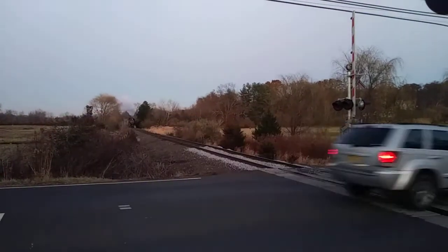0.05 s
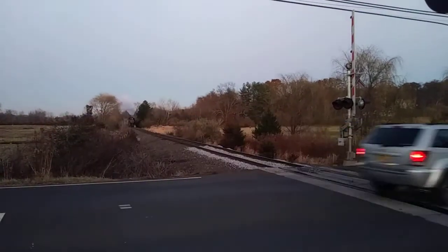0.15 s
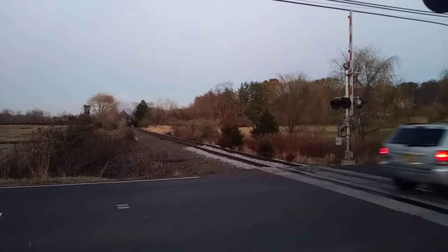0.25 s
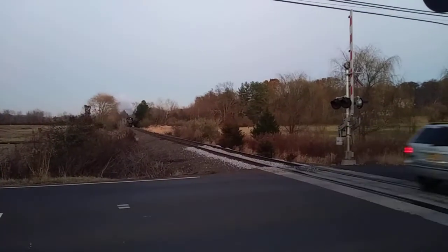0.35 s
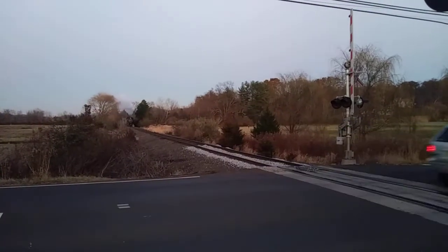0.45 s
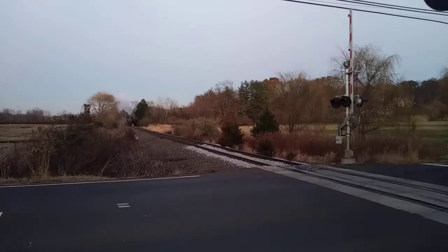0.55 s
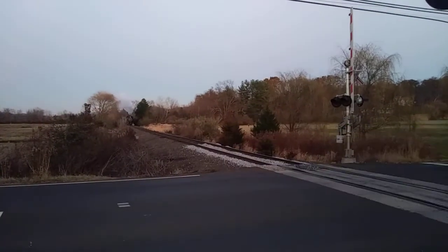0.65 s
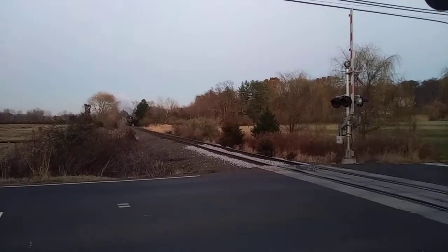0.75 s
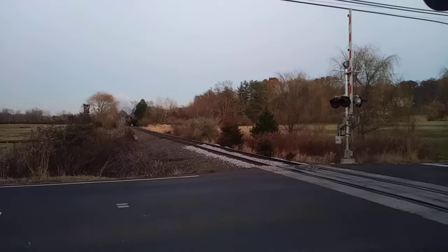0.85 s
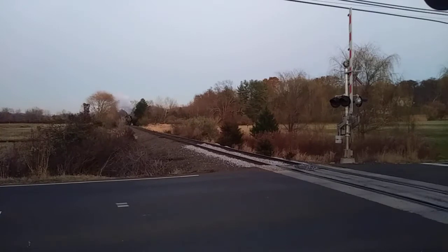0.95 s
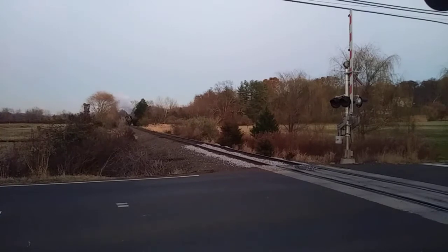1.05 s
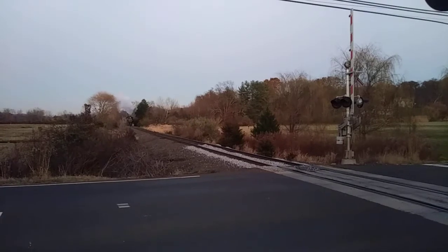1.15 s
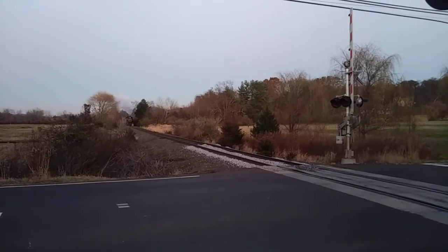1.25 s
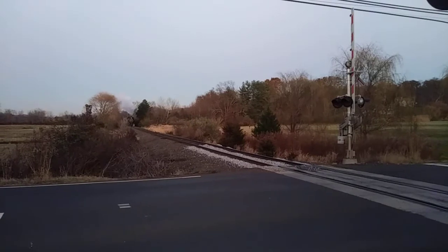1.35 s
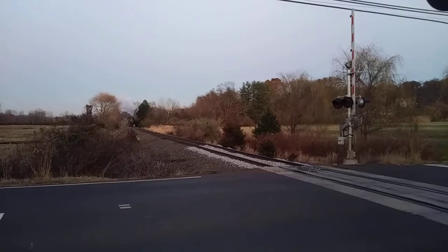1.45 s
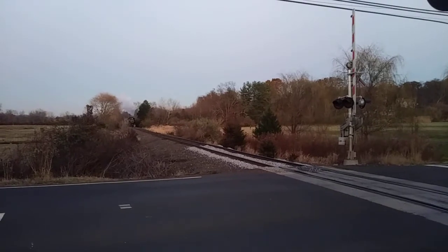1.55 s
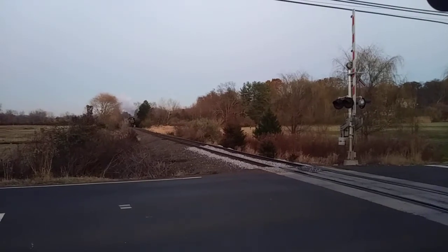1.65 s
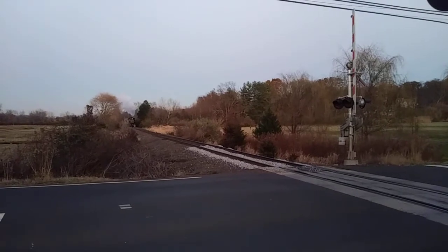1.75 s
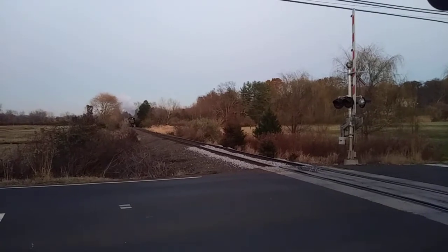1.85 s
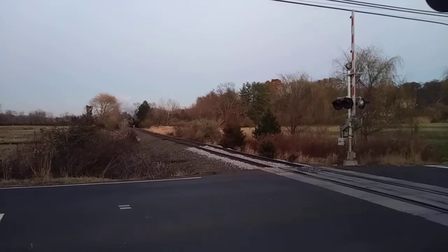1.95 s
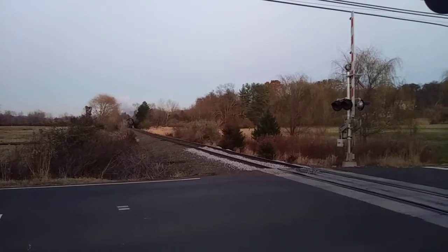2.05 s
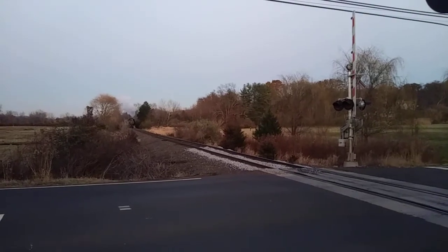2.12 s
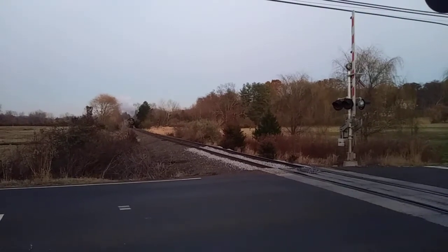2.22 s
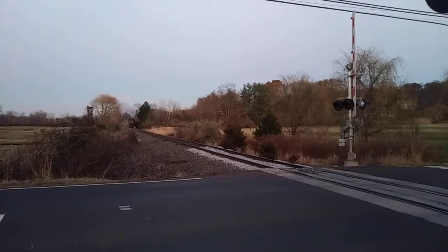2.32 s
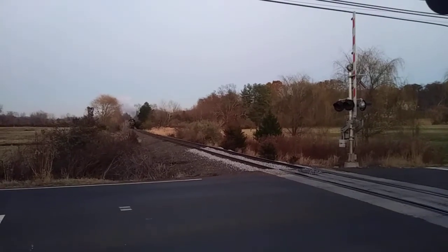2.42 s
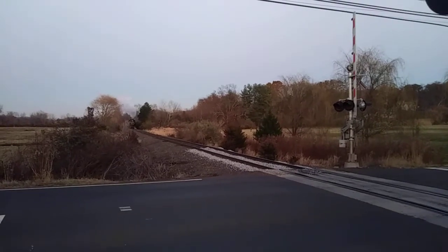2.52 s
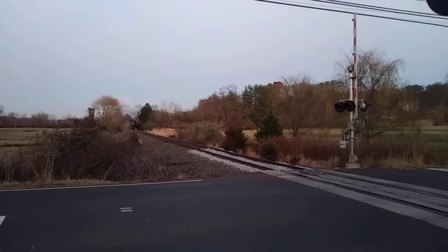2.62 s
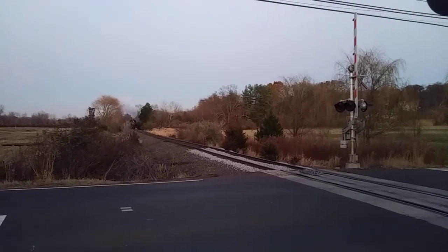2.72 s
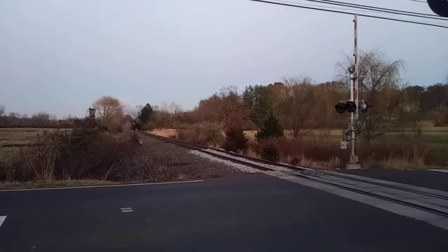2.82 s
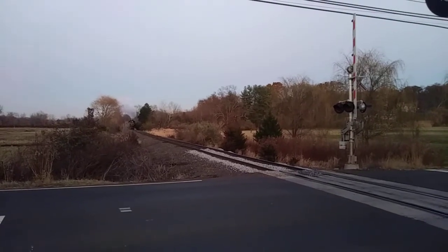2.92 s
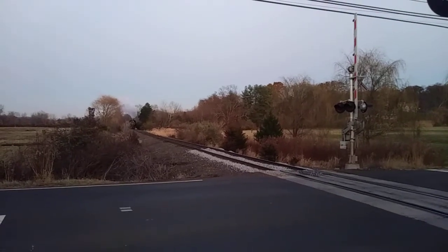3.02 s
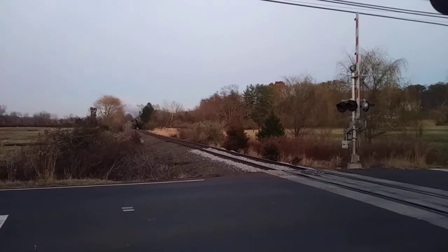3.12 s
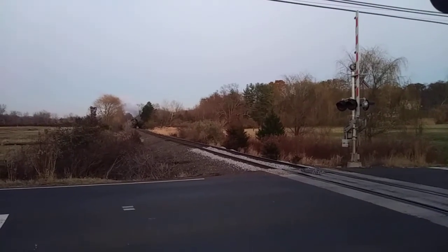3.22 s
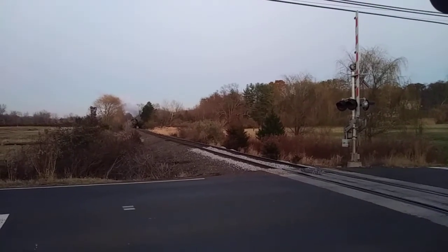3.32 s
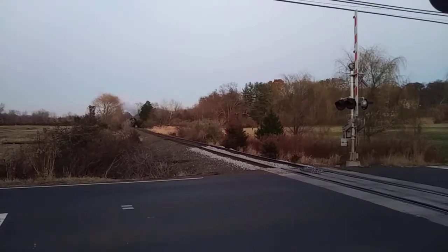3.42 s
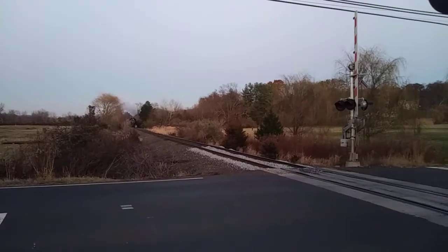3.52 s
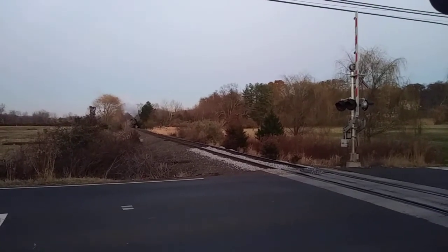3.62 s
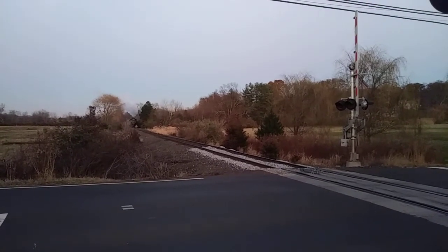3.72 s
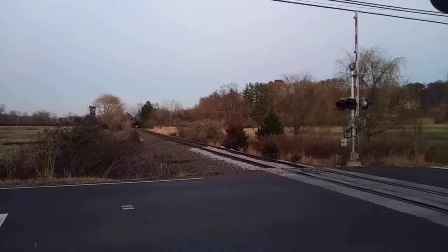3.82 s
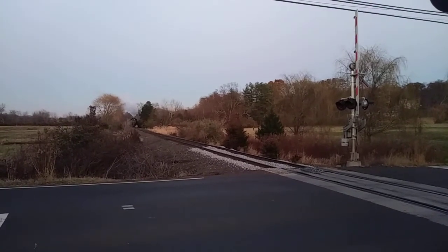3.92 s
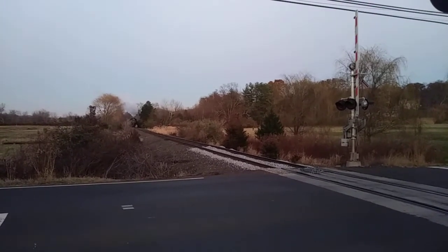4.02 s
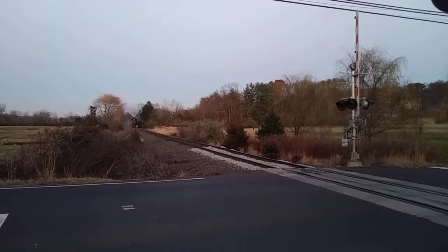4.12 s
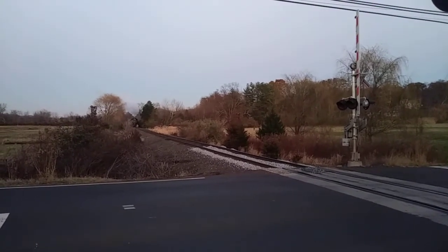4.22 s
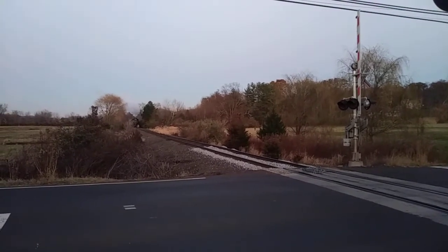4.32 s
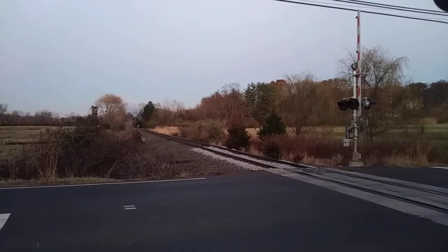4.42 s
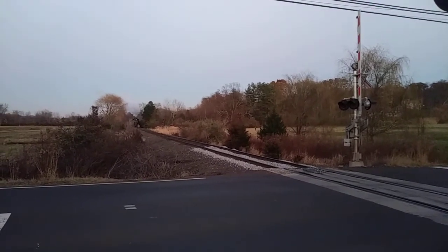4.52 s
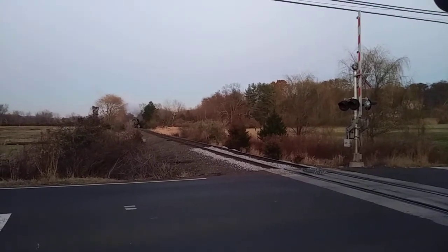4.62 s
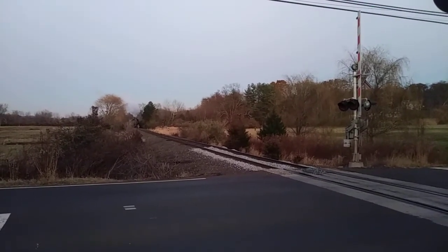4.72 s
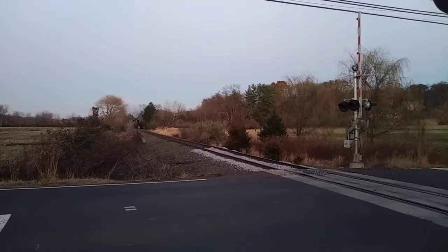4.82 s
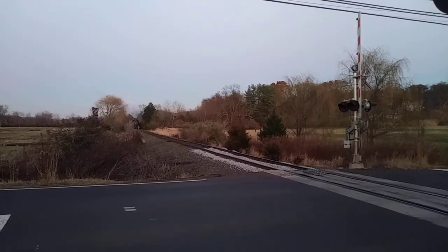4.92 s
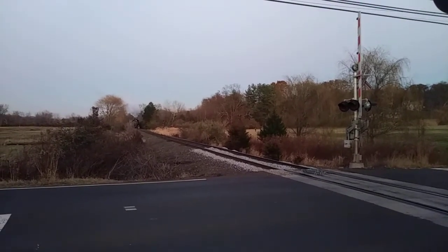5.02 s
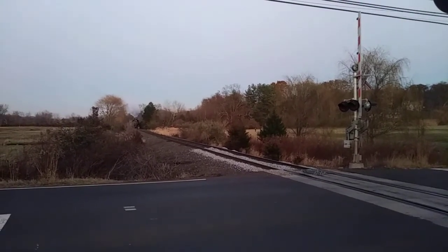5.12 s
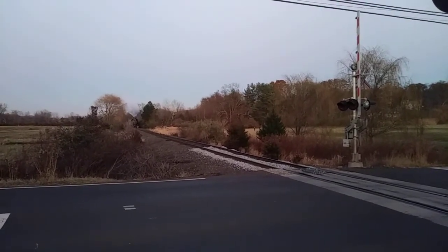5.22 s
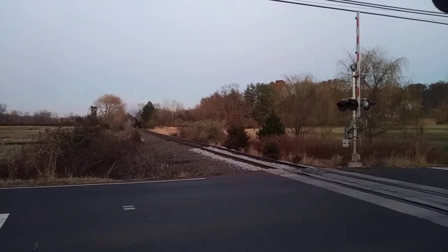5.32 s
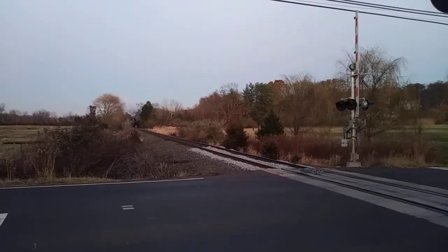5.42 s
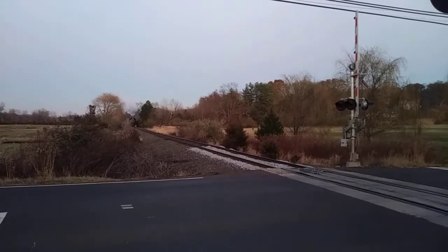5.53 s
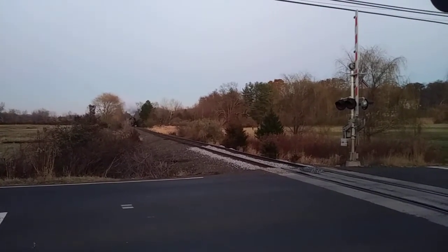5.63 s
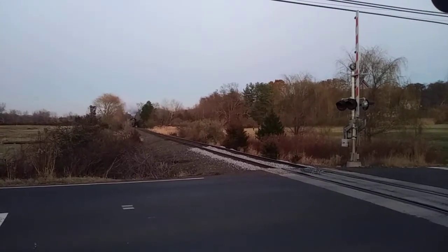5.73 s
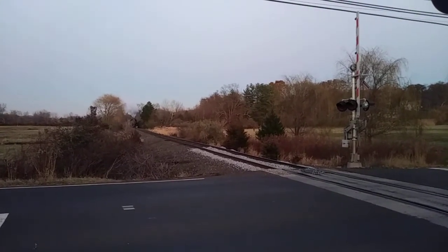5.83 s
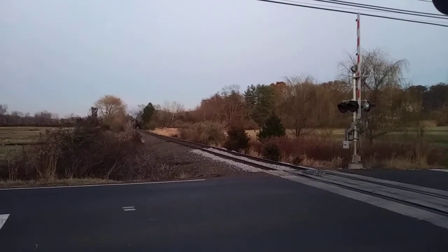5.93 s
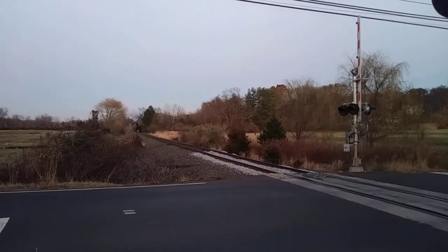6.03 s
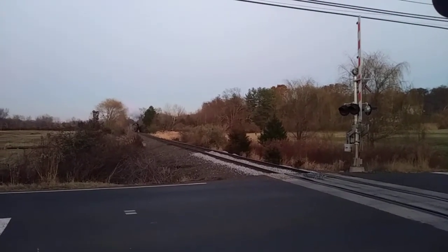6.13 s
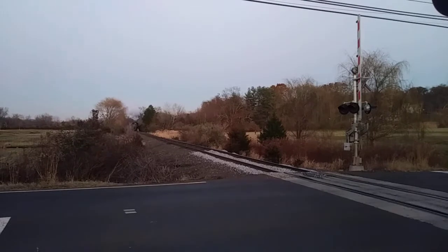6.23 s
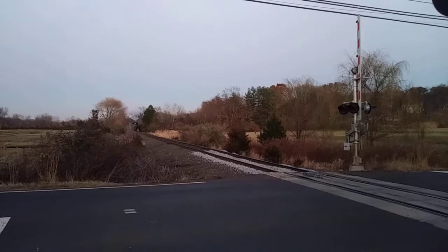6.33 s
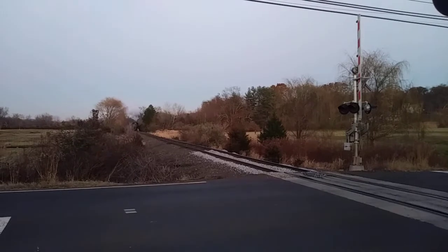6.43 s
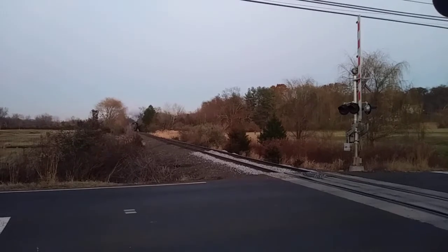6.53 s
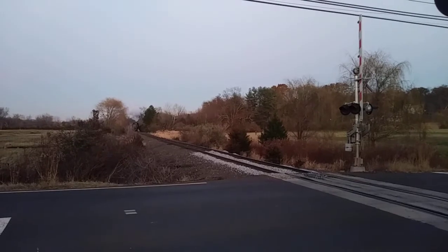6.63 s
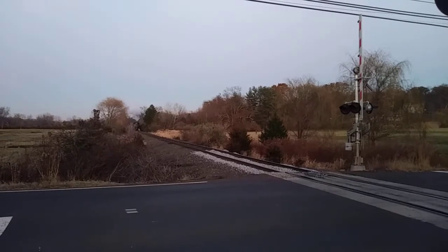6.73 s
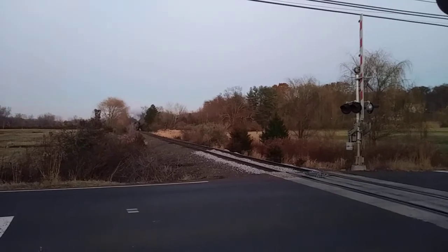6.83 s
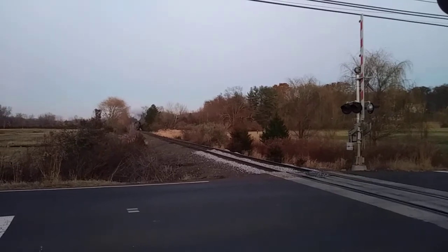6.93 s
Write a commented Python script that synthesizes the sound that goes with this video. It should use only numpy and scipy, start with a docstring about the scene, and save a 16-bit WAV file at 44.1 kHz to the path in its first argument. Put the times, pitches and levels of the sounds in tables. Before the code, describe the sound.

Tyres clatter over the rails of a country level crossing in three quick thumps, then the car rolls off with a dull, fading roar. Shortly after, something knocks hard inside the parked car where the phone microphone sits. The rest is quiet: thin, flickering road noise through the closed windows, occasional soft bumps of the car body, a light tick and a faint puff of hiss.

```python
"""Inside a parked car. In the first half second another car's tyres thump over the panels of a level
crossing, which ring and rattle. It rolls away; its road roar carries on through the cabin resonances.
From 0.7 s the body bumps softly, with faint ticks and pips. At 1.5 s something knocks in the cabin;
at 6 s comes a brief hiss. Throughout, a phone's noise suppressor pushes the steady background down,
so only what rises over it flickers through."""
import sys
import numpy as np
from scipy import signal
from scipy.fft import rfft, irfft
from scipy.io import wavfile
from scipy.ndimage import uniform_filter1d, map_coordinates

SR = 44100
rng = np.random.default_rng(int(sys.argv[2]) if len(sys.argv) > 2 else 0)


def put_to_file(sound):
    """Save the sound as 16-bit audio at rate SR, in the file named by the first command-line argument."""
    columns = np.atleast_2d(sound).T  # one column per channel
    safe = np.clip(columns, -1, 1)
    whole_steps = np.round(safe * 32767)
    wavfile.write(sys.argv[1], SR, whole_steps.astype(np.int16))


N = 306980
FRAME = 512
STFT = dict(fs=SR, nperseg=FRAME, noverlap=FRAME * 3 // 4)


def from_db(db):
    """Decibels to gain."""
    return 10 ** (np.asarray(db) / 20)


def unit_rms(x):
    """Scale to unit rms."""
    return x / np.sqrt(np.mean(x ** 2) + 1e-20)


def at_hz(table, hz):
    """Read a table on a log-frequency axis."""
    table_hz, values = np.transpose(table)
    return np.interp(np.log(np.maximum(hz, 1)), np.log(table_hz), values)


def band(x, low_hz, high_hz, order=2):
    """Butterworth band-pass."""
    sos = signal.butter(order, [low_hz, min(high_hz, .45 * SR)], "band", fs=SR, output="sos")
    return signal.sosfilt(sos, x)


def bell(hz, centre_hz, width_hz):
    """Flat-topped resonance; passes about unit power of white noise."""
    return np.exp(-np.abs(2 * (hz[:, None] - centre_hz) / width_hz) ** 3) * SR / (1.79 * width_hz)


def flare(t, start_s, attack_s, hold_s, t60_s):
    """Envelope: linear rise, hold, exponential fall."""
    rise = np.clip((t - start_s) / attack_s, 0, 1)
    return rise * from_db(-60 * np.maximum(t - start_s - attack_s - hold_s, 0) / t60_s)


def clicks(start_s, level_db):
    """Single-sample impulses."""
    out = np.full(N, 1e-18)
    out[(np.asarray(start_s) * SR).astype(int)] = from_db(level_db)
    return out


def ring(x, hz, t60_s):
    """One mode: a unit click starts a decaying unit sine."""
    r, w = from_db(-60 / (t60_s * SR)), 2 * np.pi * hz / SR
    return signal.lfilter([0, np.sin(w)], [1, -2 * r * np.cos(w), r * r], x)


def strike(start_s, level_db, tilt_db_per_oct, modes):
    """Each contact rings all modes, with random spread; harder contacts tilt towards the high ones."""
    spread_db = 1.5 * rng.standard_normal((len(start_s), len(modes)))
    out = np.zeros(N)
    for k, (hz, gain_db, t60_s) in enumerate(modes):
        drive_db = level_db + gain_db + tilt_db_per_oct * np.log2(hz / 250) + spread_db[:, k]
        out += ring(clicks(start_s, drive_db), hz, t60_s)
    return out


def snap(start_s, level_db, t60_s, low_hz, high_hz):
    """Short bursts of band noise."""
    envelope = signal.lfilter([1], [1, -from_db(-60 / (t60_s * SR))], clicks(start_s, level_db))
    burst = band(envelope * rng.standard_normal(N), low_hz, high_hz)
    return burst * np.sqrt(SR / 2 / (high_hz - low_hz))


def noise_tail(start_s, level_db, spectrum, decay):
    """Each contact starts noise; each quarter octave decays at its own rate."""
    end = int((start_s[-1] + .8) * SR)
    onset_power = clicks(start_s, 2 * level_db)[:end]
    white = rng.standard_normal((2, end))
    edges_hz = 110 * 2 ** np.arange(0, 7.3, .25)
    out = np.zeros(N)
    for k, (low_hz, high_hz) in enumerate(zip(edges_hz, edges_hz[1:])):
        hz = np.sqrt(low_hz * high_hz)
        power = signal.lfilter([1], [1, -from_db(-120 / (at_hz(decay, hz) * SR))], onset_power)
        noise = band(white[k % 2], low_hz, high_hz, order=4)
        out[:end] += from_db(at_hz(spectrum, hz)) * np.sqrt(power) * noise
    return out


# steady noise floor, re unit white noise: freq_hz, level_db
FLOOR_SPECTRUM = [(20, -30.5), (60, -22.5), (115, -26.5), (160, -42.5), (260, -36), (500, -37.5),
                  (1400, -34), (2500, -47.5), (5500, -53.5), (7500, -66), (12500, -67), (15500, -66)]
def background():
    """Far traffic, wind and microphone hiss, all steady."""
    gain = from_db(at_hz(FLOOR_SPECTRUM, np.fft.rfftfreq(N, 1 / SR)))
    return irfft(rfft(rng.standard_normal(N)) * gain, N)


# pips: start_s, level_db, pitch_hz
HIGH_PIPS = [(1.4007, -63, 7900), (4.3236, -66, 7830), (4.9846, -59, 7840), (5.5144, -62, 7840)]
def pips():
    """Faint high sines that die quickly."""
    tones = sum(ring(clicks(start_s, db), hz, t60_s=.092) for start_s, db, hz in HIGH_PIPS)
    return band(tones, 6700, 8200)


# hiss resonances: centre_hz, width_hz, gain_db
HISS_BANDS = [(5000, 96, -2), (5360, 53, -5), (5700, 56, -8), (6260, 120, -11), (6800, 130, -9),
              (7700, 56, -8), (7870, 160, -17), (8530, 48, -12), (9700, 41, -17), (10060, 280, -16),
              (10900, 45, -18), (11300, 41, -25)]
def brief_hiss():
    """One puff of noise, coloured by narrow resonances."""
    white = rng.standard_normal(N)
    broad = unit_rms(band(white, 4700, 11800, order=5))
    narrow = sum(from_db(db) * band(white, hz - width / 2, hz + width / 2)
                 for hz, width, db in HISS_BANDS)
    envelope = flare(np.arange(N) / SR, start_s=5.995, attack_s=.01, hold_s=.03, t60_s=.15)
    return from_db(-51.5) * envelope * (unit_rms(narrow) + from_db(-2.5) * broad)


# light contacts: start_s, level_db, tilt_db_per_oct
TICK_CONTACTS = [(0.8954, -53.5, -0.1), (5.5553, -46, -0.6)]
# modes of the ticking part: freq_hz, gain_db, t60_s
TICK_MODES = [(256, 8.5, 0.049), (1470, 17, 0.049), (2316, -3.5, 0.16), (3480, -3, 0.11), (4750, -7, 0.13),
              (6680, -8, 0.034), (7800, -6, 0.054), (8660, -23, 0.14), (10130, -13, .05), (11300, -35, .05),
              (12600, -18, .04)]
def ticks():
    """A small part in the cabin rings and snaps at each contact."""
    start_s, level_db, tilt = np.transpose(TICK_CONTACTS)
    ringing = strike(start_s, level_db, tilt, TICK_MODES)
    return ringing + snap(start_s, level_db - 2, t60_s=.079, low_hz=1000, high_hz=6000)


# bumps: start_s, level_db, pitch_hz
BODY_BUMPS = [(0.679, -33, 61.4), (0.78, -36.5, 59.3), (2.116, -32, 121.7), (3.59, -37.5, 122),
              (3.985, -34, 115), (4.755, -40.5, 119), (4.863, -33.5, 117), (5.008, -34.5, 115.4),
              (5.127, -32, 111.4), (5.234, -33, 114), (5.546, -38.5, 118), (6.645, -40.5, 121)]
def body_bumps():
    """Soft contacts each ring one low mode of the car body, with no sharp edge."""
    tones = sum(ring(clicks(start_s, db), hz, t60_s=.42) for start_s, db, hz in BODY_BUMPS)
    return band(band(tones, 30, 190), 30, 130)


# road noise layers at fixed pitch: time_s, level_db
DRONE_CURVE = [(0, -35), (.6, -37), (.75, -51.5), (1.05, -35.5), (1.35, -48), (1.6, -37.5), (2.35, -42),
               (2.5, -46.5), (3.15, -47.5), (3.3, -54), (3.95, -52), (4.05, -44.5), (4.5, -54),
               (5.2, -48.5), (5.5, -63), (5.75, -45.5), (6.15, -62), (6.3, -44.5), (6.5, -51), (6.96, -49)]
UPPER_ROAR_CURVE = [(0.0, -51.5), (0.29, -51.5), (0.48, -65), (1.1, -83), (2.81, -61.5), (3.31, -83),
                    (3.62, -80), (5.45, -59), (6.11, -54.5), (6.96, -50.5)]
TREBLE_CURVE = [(0, -43.5), (.25, -47.5), (.5, -62.5), (.8, -68.5), (1.25, -64.5), (1.45, -64.5),
                (2.0, -63), (2.6, -57), (2.95, -58), (3.3, -100)]
# road noise layers at moving pitch: time_s, level_db, centre_hz
ROAR_CURVE = [(0.0, -30.5, 1328), (0.17, -39, 1170), (0.66, -43.5, 1300), (0.72, -41.5, 1194),
              (1.28, -43.5, 1290), (1.43, -45, 1240), (1.47, -42.5, 1350), (1.82, -47, 1300),
              (2.36, -41, 1407), (2.85, -40.5, 1354), (3.24, -41, 1387), (4.96, -39, 1384),
              (5.56, -40.5, 1322), (6.14, -39.5, 1361), (6.65, -40.5, 1360), (6.96, -39, 1190)]
WHINE_CURVE = [(0.0, -39.5, 3190), (0.04, -40, 3420), (0.95, -57, 3247), (1.49, -46.5, 3340),
               (1.51, -43, 3280), (1.65, -53.5, 3240), (2.25, -49.5, 3314), (2.38, -44, 3460),
               (2.87, -40.5, 3400), (3.25, -59.5, 3450), (3.47, -60, 3280), (3.49, -49.5, 3240),
               (3.88, -51.5, 3400), (3.93, -57.5, 3070), (4.67, -60, 3530), (4.71, -55, 3300),
               (4.79, -65.5, 3240), (5.21, -56, 3340), (5.45, -68, 3390), (6.2, -60.5, 3570),
               (6.49, -73, 3300), (6.96, -59.5, 3540)]
# cabin resonances, one list per layer: centre_hz, width_hz, gain_db
CABIN_RESONANCES = [
    [(819.2, 62.9, 2.5), (877, 85, -16)],
    [(1400, 450, 1)],
    [(1796, 290, 1), (2315, 430, -6.5)],
    [(3348, 527, 1)],
    [(4260, 1200, -3.5), (5150, 230, -6), (5630, 110, -10.5), (6880, 140, -19), (7430, 160, -19.5)],
]
# flicker scale, one per layer: depth_db
FLICKER_DEPTHS = [4, 1.4, 4.5, 3.5, 4.5]
# fine and broad flicker patches: width_hz, length_s
PATCH_SIZES = [(95, .05), (230, .13)]
# narrow treble flares: start_s, hold_s, centre_hz, width_hz, level_db
TREBLE_WISPS = [(1.894, 0.1, 6820, 110, -64), (2.02, 0.11, 7650, 120, -75), (2.076, 0.05, 6820, 136, -58.5),
                (2.377, 0.12, 5150, 120, -61), (2.504, 0.059, 6910, 121, -65),
                (2.56, 0.26, 5090, 180, -56.5), (2.785, 0.11, 5840, 250, -50.5),
                (2.8, 0.076, 5300, 200, -51), (2.798, 0.1, 6300, 110, -57)]
def road_roar():
    """Tyre noise sounds through the resonances of the closed cabin, in patches that come and go."""
    hz, t, bins = signal.stft(rng.standard_normal(N), **STFT)
    flicker = 0
    for width_hz, length_s in PATCH_SIZES:
        grid = np.meshgrid(hz / width_hz, t / length_s, indexing="ij")
        flicker += unit_rms(map_coordinates(rng.standard_normal((250, 150)), grid, order=1))
    flicker = np.minimum(flicker, .8)   # free dips, capped rises

    layers = (DRONE_CURVE, ROAR_CURVE, UPPER_ROAR_CURVE, WHINE_CURVE, TREBLE_CURVE)
    power = 0
    for curve, resonances, depth_db in zip(layers, CABIN_RESONANCES, FLICKER_DEPTHS):
        time_s, level_db, *moving_hz = np.transpose(curve)
        layer_db = np.interp(t, time_s, level_db) + depth_db * flicker
        for centre_hz, width_hz, gain_db in resonances:
            if moving_hz:
                centre_hz = np.interp(t, time_s, moving_hz[0])
            power += bell(hz, centre_hz, width_hz) * from_db(layer_db + gain_db) ** 2
    for start_s, hold_s, centre_hz, width_hz, level_db in TREBLE_WISPS:
        envelope = flare(t, start_s, attack_s=.018, hold_s=hold_s, t60_s=.18)
        power += bell(hz, centre_hz, width_hz) * (from_db(level_db + 3 * flicker) * envelope) ** 2
    return signal.istft(bins * np.sqrt(power), **STFT)[1][:N]


# blow and bounces: start_s, level_db, crack_db, tilt_db_per_oct, snap_db
KNOCK_CONTACTS = [(1.496, -24, -9, 2.5, -48), (1.501, -11, -9, 7, -27), (1.504, -29, -4.5, -1, -26.5),
                  (1.516, -21, -13, 4, -50), (1.526, -15.5, -14, 2.5, -31), (1.532, -13, -15.5, 4, -29),
                  (1.566, -22, -16, 4, -59)]
# trim and cabin-air modes: freq_hz, gain_db, t60_s
TRIM_MODES = [(65, -22, 0.28), (92.6, 3.5, 0.34), (115.5, -1, 0.62), (159.5, -14, 0.2), (252, -21, 0.1),
              (422, -7, 0.033), (594, -18.5, 0.04), (1404, -21, .04)]
# crack colour: freq_hz, gain_db
CRACK_SPECTRUM = [(200, 2), (420, -10), (550, -24), (700, -7.5), (1400, -14.5), (2100, -20.5), (3000, -23),
                  (5300, -22.5), (7500, -32), (11000, -54), (12900, -77), (15300, -45)]
# crack decay: freq_hz, t60_s
CRACK_DECAY = [(300, 0.28), (3000, 0.21), (13000, 0.16)]
def cabin_knock():
    """A hard, bouncing blow rings the trim, with snaps and a bright crack."""
    start_s, level_db, crack_db, tilt, snap_db = np.transpose(KNOCK_CONTACTS)
    thud = strike(start_s, level_db, tilt, TRIM_MODES)
    snaps = snap(start_s, snap_db, t60_s=.012, low_hz=2100, high_hz=5400)
    crack = noise_tail(start_s, crack_db, CRACK_SPECTRUM, CRACK_DECAY)
    return thud + snaps + crack


# tyres on panel edges: start_s, level_db, rattle_db, tilt_db_per_oct, snap_db
WHEEL_DROPS = [(0.009, -28.5, -24, -2, -25), (0.018, -16, -5, 2, -35), (0.045, -28.5, -5, -8.5, -40),
               (0.165, -31, -1.5, 10, -27), (0.184, -13, -1.5, 6.5, -21), (0.208, -25.5, -25, 8.5, -24),
               (0.213, -18.5, -25, 6, -25), (0.347, -28.5, -16, 9.5, -50), (0.355, -11, -3.5, 0, -45),
               (0.382, -19, -28, 1, -32), (0.408, -24, -12, -9, -33)]
# panel and wheel modes: freq_hz, gain_db, t60_s
PANEL_MODES = [(77, -10.5, 0.19), (125.4, -14.5, 0.73), (220, -18, 0.044), (252, -4.5, 0.065),
               (299, -1.5, 0.098), (353.4, -3, 0.1), (404, -27, 0.22), (1010, -6.5, 0.012),
               (1550, -20.5, 0.01), (1910, -29, 0.0093), (2400, -27.5, 0.013)]
# rattle colour: freq_hz, gain_db
RATTLE_SPECTRUM = [(59, -34), (100, -1.5), (330, -2), (564, -29), (778, -9), (1150, -13), (1700, -23.5),
                   (2150, -49), (2700, -19), (3420, -31), (4310, -33), (5340, -23.5), (7110, -49.5),
                   (9240, -61), (15600, -120)]
# rattle decay: freq_hz, t60_s
RATTLE_DECAY = [(150, 0.48), (1000, 0.52), (7000, 0.41)]
def level_crossing(glass_cutoff_hz=7300):
    """Each wheel drop rings the panels, snaps and leaves a rattle; the windows block the top."""
    start_s, level_db, rattle_db, tilt, snap_db = np.transpose(WHEEL_DROPS)
    thumps = strike(start_s, level_db, tilt, PANEL_MODES)
    snaps = snap(start_s, snap_db, t60_s=.006, low_hz=840, high_hz=6000)
    rattle = noise_tail(start_s, rattle_db, RATTLE_SPECTRUM, RATTLE_DECAY)
    outside = band(thumps + snaps + rattle, 84, 16000)
    return signal.sosfilt(signal.butter(10, glass_cutoff_hz, fs=SR, output="sos"), outside)


def scene():
    """All sources at one microphone."""
    traffic = background() + road_roar() + level_crossing()
    cabin = cabin_knock() + body_bumps() + ticks() + pips() + brief_hiss()
    return (traffic + cabin)[None]


def noise_suppressor(x, margin_db=3.5, min_gain_db=-13, memory=.73):
    """Subtracts the noise floor's power bin by bin, down to a minimum gain."""
    hz, _, bins = signal.stft(x, **STFT)
    power = np.abs(bins) ** 2 * FRAME * 2 / 3   # unit white noise has power 1
    power = uniform_filter1d(power, size=3, axis=1)   # smooth over frequency
    power = signal.lfilter([1 - memory], [1, -memory], power)   # smooth over time
    floor_power = from_db(at_hz(FLOOR_SPECTRUM, hz) + margin_db)[:, None] ** 2
    kept_share = np.maximum(1 - floor_power / (power + 1e-20), 0)
    gain = np.maximum(np.sqrt(kept_share), from_db(min_gain_db))
    return signal.istft(bins * gain, **STFT)[1][:, :N]


def record(dry):
    """Phone microphone: bass cut, soft clip, noise suppressor, top cut."""
    bass_cut = signal.butter(3, 45, "high", fs=SR, output="sos")
    top_cut = signal.cheby2(20, 60, 15950, fs=SR, output="sos")
    ceiling = .75
    clipped = ceiling * np.tanh(signal.sosfilt(bass_cut, dry) / ceiling)
    return signal.sosfilt(top_cut, noise_suppressor(clipped))


dry = scene()
out = record(dry)
put_to_file(out)
```